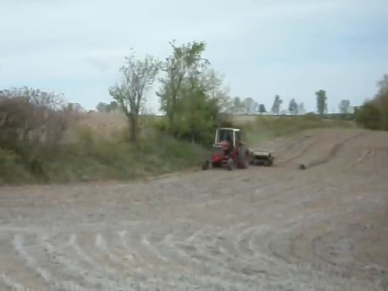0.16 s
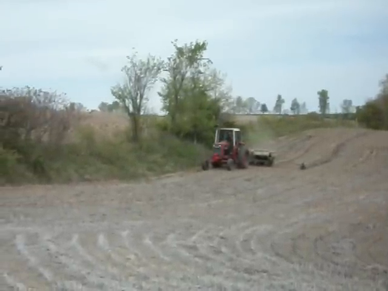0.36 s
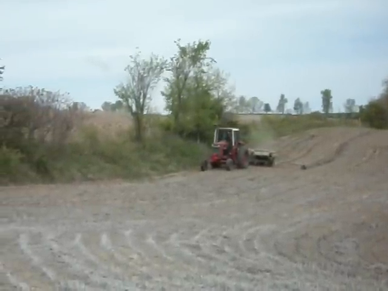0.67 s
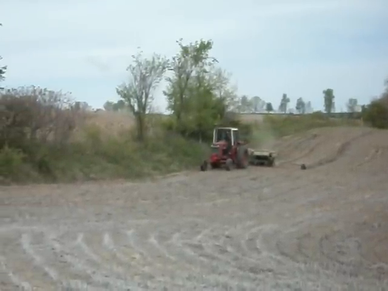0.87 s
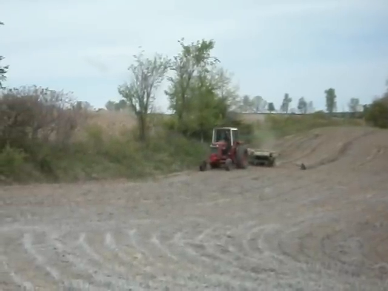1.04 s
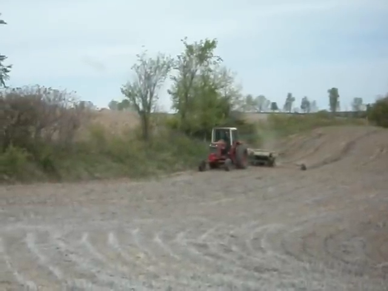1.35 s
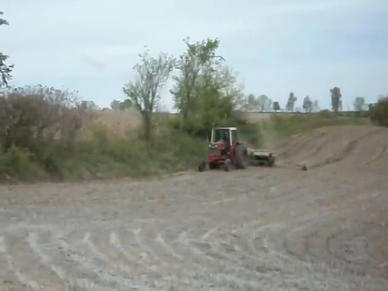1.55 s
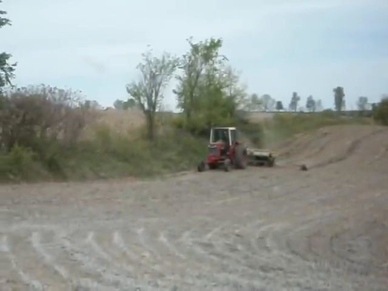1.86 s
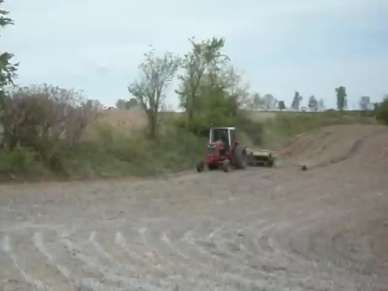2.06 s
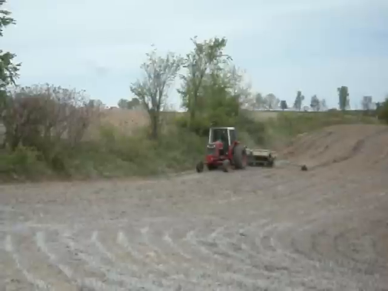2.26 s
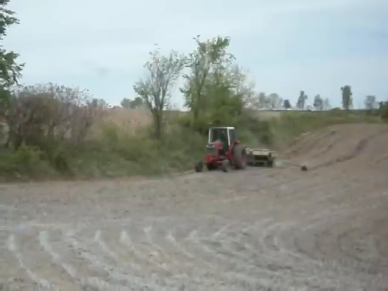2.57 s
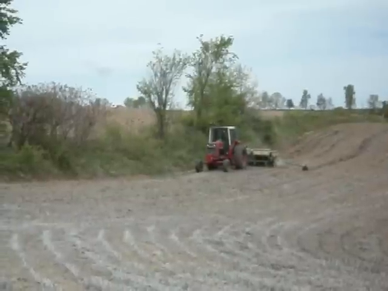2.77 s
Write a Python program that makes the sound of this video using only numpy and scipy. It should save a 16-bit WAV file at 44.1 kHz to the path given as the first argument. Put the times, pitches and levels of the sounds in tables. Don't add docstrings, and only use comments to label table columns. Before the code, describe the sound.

A diesel tractor pulls a planter across a field, its steady hum, metallic clatter and fan roar barely changing; wind rumbles and thumps the small microphone, more strongly later, with brief faint bird chirps.

```python
import sys
import numpy as np
from scipy import signal
from scipy.fft import rfft, irfft
from scipy.io import wavfile
from scipy.ndimage import uniform_filter1d

SR = 44100
rng = np.random.default_rng(int(sys.argv[2]) if len(sys.argv) > 2 else 0)


def volts_from_db(level):
    exponent = np.asarray(level, float) / 20
    return 10 ** exponent


def transcribe(signal):
    frames = np.atleast_2d(signal).T
    limited = np.clip(frames, -1, 1)
    pcm = np.round(limited * 32767).astype(np.int16)
    wavfile.write(sys.argv[1], SR, pcm)


N = 128772

TONE_ORDERS = [6, 10.92, 12, 16, 18, 25, 26, 30, 33, 57, 63, 66]
# (level [dB], waver [dB])
TONES = [(-22.5, .8), (-25.5, .8), (-37, 2), (-45, 2), (-44, 2), (-47, 2), (-43, 2), (-45, 2), (-46, 2),
         (-43, 2), (-43, 2), (-32, .6)]
# (frequency [Hz], width [Hz], level [dB])
BLOCK_RESONANCES = [(1240, 25, -8.5), (1292.4, 50, -0.5), (1414.5, 31, 0), (1462.4, 35.5, -1),
                    (1537, 30, -2), (1640, 60, -3.5), (1810, 72, 1), (1887, 28, 0.5), (1946, 20, 0),
                    (1965, 38, 0), (2068, 55, -3), (2193, 33, -2.5), (2243, 22, -1), (2380, 50, -5)]
PULSE_ORDERS = [1, 2, 3, 5, 6, 7, 8, 11, 13, 15, 17]
PULSE_DEPTHS = [.04, .05, .075, .05, .05, .05, .05, .05, .06, .06, .05]
# (frequency [Hz], density [dB per Hz])
ROAR_COLOUR = [(60, -50), (130, -1.5), (384, -15.5), (1150, -12), (2600, -8), (4600, -13), (5200, -16.5),
               (5500, -23.5)]
# (time [s], level [dB])
CLATTER_LOUDNESS = [
    (0, 1),
    (.5, 0.16),
    (.8, 1),
    (1.1, 0.72),
    (1.4, -1),
    (1.8, -1),
    (2.2, -0.96),
    (2.6, -0.53),
    (2.92, -0.97),
]
# (time [s], level [dB])
GUSTS = [(0, -27.5), (.22, -25), (.29, -31), (.37, -18), (.63, -26.5), (.82, -21), (1.1, -22), (1.4, -21.5),
         (1.74, -24.5), (1.8, -20.5), (1.95, -16.5), (2.03, -17.5), (2.2, -20.5), (2.3, -14.5), (2.6, -19),
         (2.72, -28), (2.87, -12.5), (2.92, -18)]
# (frequency [Hz], density [dB per Hz])
WIND_COLOUR = [(3, -13), (30, 2), (70, -5), (130, -11.5), (300, -15), (350, -28), (450, -25), (2000, -55)]
# (time [s], pressure [full scale], width [ms])
BUFFETS = [(.375, .25, 6), (.456, -.25, 7), (.47, .24, 9), (1.239, .27, 13), (1.574, -.24, 6),
           (1.809, .36, 7.5), (2.004, .42, 9), (2.025, -.3, 8), (2.047, -.3, 10), (2.062, .5, 5),
           (2.113, -.37, 8), (2.136, .43, 5), (2.257, .45, 10), (2.286, -.42, 10), (2.295, .45, 12),
           (2.312, -.43, 4), (2.338, .38, 5), (2.406, -.4, 6), (2.424, .33, 5.5), (2.502, .33, 6),
           (2.544, .3, 7), (2.636, .46, 5), (2.859, .4, 6), (2.864, -.25, 2.5), (2.868, .35, 2.5),
           (2.873, -.5, 3.5), (2.897, .3, 6)]
# (start [s], length [s], from [Hz], to [Hz], level [dB])
CHIRPS = [(.1, .012, 5300, 5120, -26), (.635, 0.028, 3436, 3470, -25), (1.632, .018, 3400, 2950, -21.5),
          (1.638, .008, 4500, 4200, -26), (1.664, .018, 3300, 2920, -21), (1.668, .009, 5400, 4970, -18),
          (1.669, .026, 4890, 4740, -21), (1.694, .012, 3100, 2850, -22.5), (1.737, .013, 3150, 3750, -25),
          (1.741, .03, 4200, 4117, -14), (1.769, .017, 4600, 4900, -26.5),
          (2.041, 0.033, 4540, 4500, -24.5), (2.1, .01, 5100, 5100, -35.5),
          (2.816, .025, 4800, 4710, -26.5)]
# (frequency [Hz], gain [dB])
MIRROR_FILTER = [(3000, 0.5), (4500, 2), (5500, -1.5), (6300, -15.5), (6800, -31.5), (7050, -45.5),
                 (7150, -41.5), (7300, -79.5)]


def evened(x):
    return x / np.sqrt(np.mean(x ** 2) + 1e-20)


def read(points, hz):
    f, value = np.transpose(points)
    return np.interp(np.log(hz + 1), np.log(f + 1), value)


def colour(x, points):
    hz = np.fft.rfftfreq(len(x), 1 / SR)
    return irfft(rfft(x) * volts_from_db(read(points, hz)), len(x))


def drift(rate_hz):
    hz = np.fft.rfftfreq(N, 1 / SR)
    return evened(irfft(rfft(rng.standard_normal(N)) * np.exp(-(hz / rate_hz) ** 2), N))


def ring(x, hz, width_hz):
    r = np.exp(-np.pi * width_hz / SR)
    return signal.lfilter([1 - r, 0, r - 1], [1, -2 * r * np.cos(2 * np.pi * hz / SR), r * r], x)


def engine_tones(turns):
    tones = np.zeros(N)
    for order, (level_db, waver_db) in zip(TONE_ORDERS, TONES):
        level = np.sqrt(2) * volts_from_db(level_db + waver_db * drift(3))
        phase = 2 * np.pi * (order * turns + rng.random()) + 0.44 * drift(2.6)
        tones += level * np.sin(phase)
    return tones


def engine_knocks(turns):
    count, firings, cycle_count = 48, 6, 53
    spread_db, fire_db, uneven_db = 2.5, 3, 3
    slip_s, vary, smear_s = .00003, 0.31, .004
    index = np.arange(count)
    place, size = rng.random(count), rng.standard_normal(count)
    place[:firings] = np.arange(firings) / firings
    firing_db = (fire_db + uneven_db * (-1) ** index) * (index < firings)
    size = np.sign(size) * volts_from_db(spread_db * abs(size) + firing_db)

    cycles = np.arange(-1, cycle_count - 1)[:, None]
    when = np.interp(cycles + place, turns, np.arange(N) / SR, left=-1, right=-1)
    when = when + slip_s * rng.standard_normal((cycle_count, count))
    strength = size * (1 + vary * rng.standard_normal(when.shape)) * (when > 0)
    samples = np.clip(when * SR, 0, N - 1).astype(int)
    knocks = np.bincount(samples.ravel(), strength.ravel(), N)
    smear = rng.standard_normal(600) * np.exp(-np.arange(600) / SR / smear_s)
    return signal.oaconvolve(knocks, smear)[:N]


def block_ringing(turns):
    knocks_db, rattle_db, patch_db = -22, -24, .8
    drive = volts_from_db(knocks_db) * evened(engine_knocks(turns)) + volts_from_db(rattle_db) * rng.standard_normal(N)
    block = np.zeros(N)
    for hz, width_hz, level_db in BLOCK_RESONANCES:
        rung = ring(ring(drive, hz, 1.66 * width_hz), hz, 1.66 * width_hz)
        block += volts_from_db(level_db + patch_db * drift(2.4)) * np.sqrt(width_hz) * evened(rung)
    return evened(block)


def engine():
    cycle_hz, speedup_hz_per_s = 17.135, .026
    block_db, roar_db, clatter_db = -20, -18, .35
    t = np.arange(N) / SR
    turns = np.cumsum(cycle_hz + speedup_hz_per_s * t) / SR
    pulse = np.ones(N)
    for order, depth in zip(PULSE_ORDERS, PULSE_DEPTHS):
        pulse += depth * np.cos(2 * np.pi * (order * turns + rng.random()))
    block = volts_from_db(block_db) * pulse * block_ringing(turns)
    roar = volts_from_db(roar_db) * evened(colour(pulse * rng.standard_normal(N), ROAR_COLOUR))
    at, db = np.transpose(CLATTER_LOUDNESS)
    loudness = volts_from_db(np.interp(t, at, db) + clatter_db * drift(14))
    return engine_tones(turns) + loudness * (block + roar)


def wind():
    lump_db, buffet_db, rebound = 2, 3, .3
    at, db = np.transpose(GUSTS)
    t = np.arange(N) / SR
    rumble = evened(colour(volts_from_db(lump_db * drift(25)) * rng.standard_normal(N), WIND_COLOUR))
    out = volts_from_db(np.interp(t, at, db) - 3) * rumble
    for time_s, pressure, width_ms in BUFFETS:
        u = (t - time_s) / (width_ms * .00055)
        push = np.exp(-u ** 2) - rebound * np.exp(-(u * rebound) ** 2)
        out += volts_from_db(buffet_db) * pressure * push
    return out


def bird():
    throb_hz, throb_depth, edge, warble_hz = 140, .45, .5, 30
    out = np.zeros(N)
    for start, length, from_hz, to_hz, db in CHIRPS:
        t = np.arange(0, length, 1 / SR)
        warble = evened(uniform_filter1d(rng.standard_normal(len(t)), size=60))
        hz = from_hz + (to_hz - from_hz) * t / length + warble_hz * warble
        throb = 1 + throb_depth * np.cos(2 * np.pi * throb_hz * (t - .006))
        shape = np.sin(np.pi * t / length) ** edge * throb
        i = round(start * SR)
        out[i:i + len(t)] += np.sqrt(2) * volts_from_db(db) * shape * np.sin(2 * np.pi * np.cumsum(hz) / SR)
    return out


def scene():
    mono = engine() + wind() + bird()
    return np.array([mono, mono])


def gain_control(x):
    threshold_db, recover_db_per_s, duck = -11.5, 207, .6
    power_db = 10 * np.log10(abs(uniform_filter1d(x ** 2, size=260, origin=100)) + 1e-12)
    fall = np.arange(N) * recover_db_per_s / SR
    held_db = np.maximum.accumulate(power_db + fall) - fall
    over_db = np.maximum(held_db - threshold_db, 0)
    return x / volts_from_db(duck * uniform_filter1d(over_db, size=200))


def slow_sampler(x):
    step = 4
    x = colour(x, [(5500, 0), (6000, -40)])
    kept = step * x * (np.arange(N) % step == 0)
    return colour(kept, MIRROR_FILTER)


def top_cut(x):
    return signal.sosfilt(signal.butter(12, 7160, fs=SR, output="sos"), x)


def record(dry):
    ceiling, offset = 1.5, -.043
    x = gain_control(dry[0])
    x = ceiling * np.tanh(x / ceiling)
    x = slow_sampler(x) + offset
    return top_cut(np.array([x, x]))


dry = scene()
out = record(dry)
transcribe(out)
```